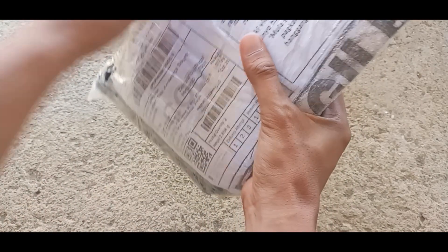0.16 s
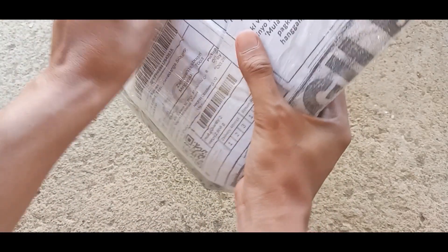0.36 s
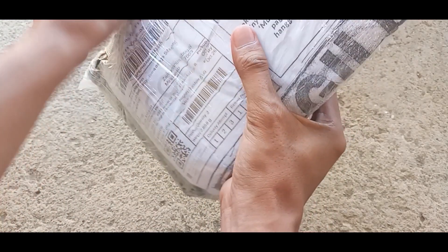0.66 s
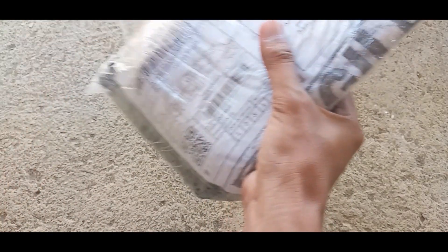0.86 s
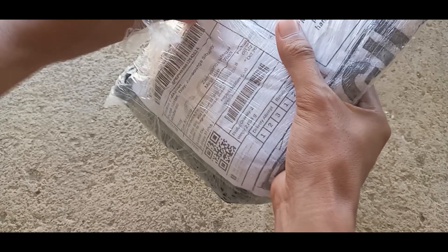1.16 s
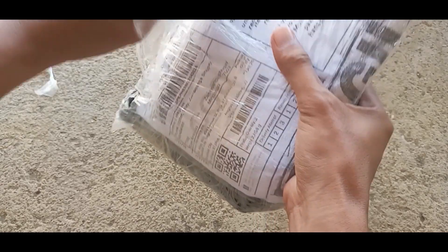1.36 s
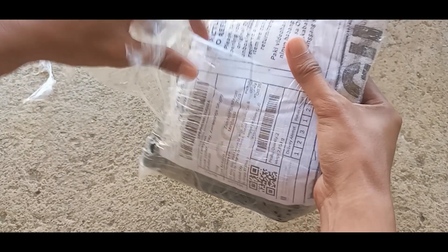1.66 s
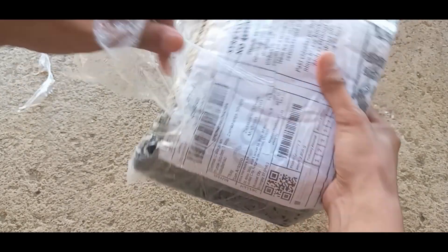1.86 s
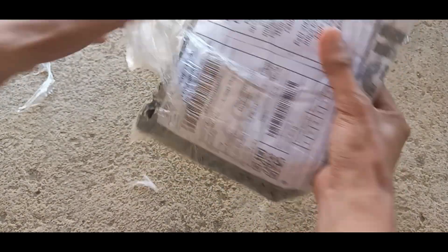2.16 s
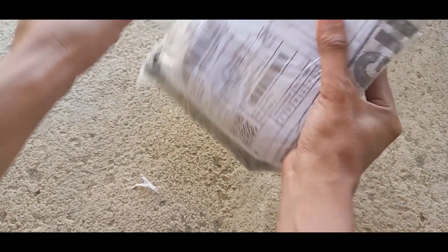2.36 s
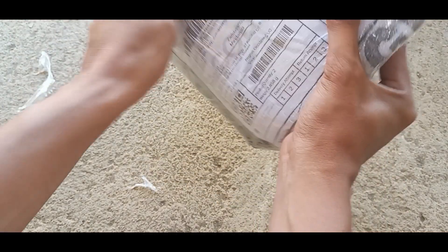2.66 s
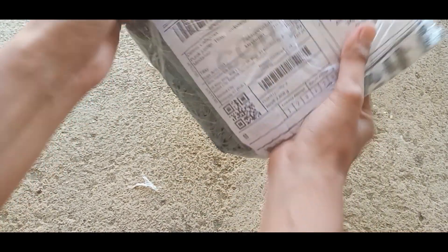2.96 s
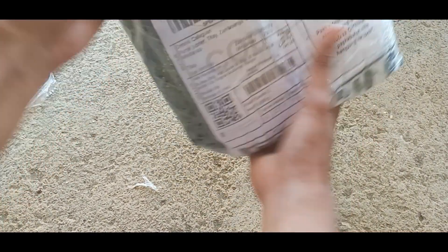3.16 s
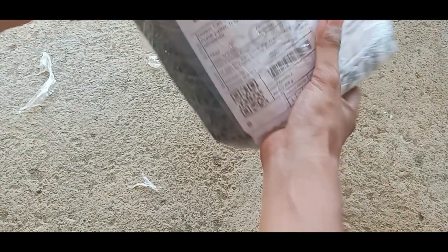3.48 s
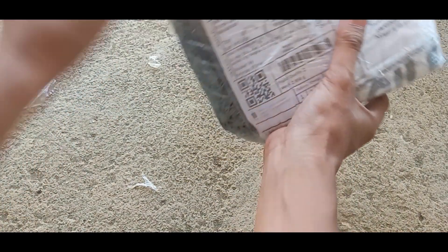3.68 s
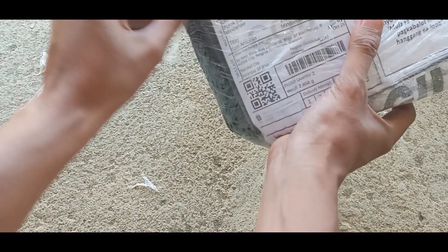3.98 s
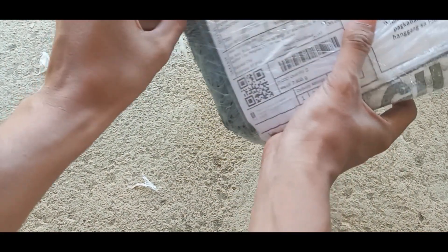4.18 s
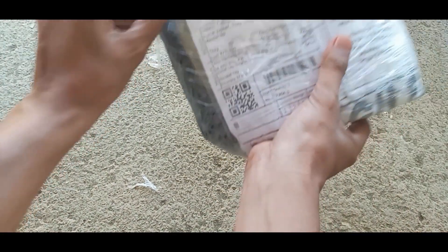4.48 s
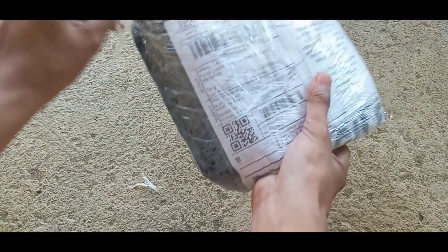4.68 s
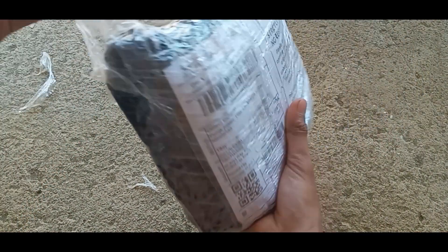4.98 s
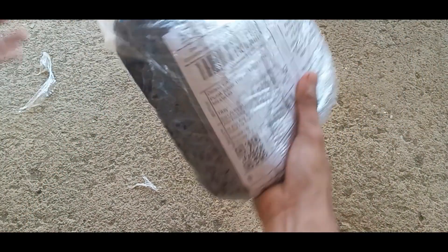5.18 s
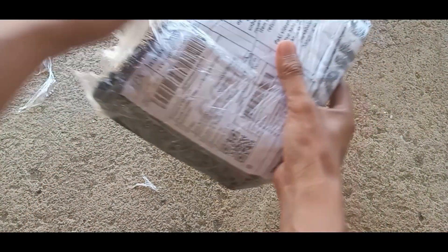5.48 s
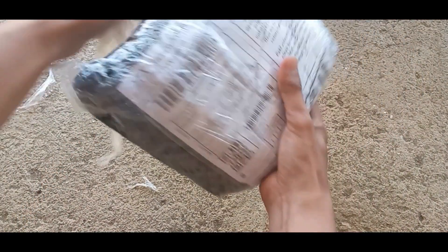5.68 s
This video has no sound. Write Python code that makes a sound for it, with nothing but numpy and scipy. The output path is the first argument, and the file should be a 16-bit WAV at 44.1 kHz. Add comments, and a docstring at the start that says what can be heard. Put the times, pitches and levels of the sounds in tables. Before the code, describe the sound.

Close-up clear plastic wrap crinkles in bursts of sharp crackling as hands tug it off a parcel, with snaps, pops and one ripping release.

```python
"""In a quiet room, close up, hands pull clear stretch wrap off a parcel in a plastic bag.
The film crinkles in swarms of buckling clicks, shaped in bands from hollow body to thin film.
Strands snap as noise bursts with decaying rings; panels pop and flip, and the parcel thuds softly.
Once the sheet rips free with two puffs of air, made as falling tones.
Resonances driven by noise form a low rumble that swells and fades underneath."""
import sys
import numpy as np
from scipy import signal
from scipy.fft import rfft, irfft, next_fast_len
from scipy.io import wavfile
from scipy.ndimage import uniform_filter1d

SR = 44100
rng = np.random.default_rng(int(sys.argv[2]) if len(sys.argv) > 2 else 0)


def int16_out(signal):
    """Quantize to a 16-bit WAV file."""
    q = np.round(np.clip(np.atleast_2d(signal).T, -1, 1) * 32767)
    wavfile.write(sys.argv[1], SR, q.astype(np.int16))


N = 257103
TIME = np.arange(N) / SR

# Loud snaps of folds and strands.
# Each row: start in seconds, level in dB before a common trim, ring frequency in Hz.
SNAPS = [(0.7406, -22.5, 2060), (1.0707, -26.5, 10300), (1.2961, -22, 1080), (1.3935, -22.5, 4600),
         (1.4231, -19.5, 2071), (1.5240, -23, 5900), (1.6608, -19.5, 6805), (1.6904, -11.5, 2200),
         (1.8872, -16.5, 5800), (1.9262, -20, 1970), (2.0224, -19.5, 1090), (2.556, -27, 4825),
         (2.694, -19.5, 1080), (2.798, -25.5, 4600), (2.8372, -21, 11170), (2.8595, -18, 6160),
         (2.9196, -27, 5240), (2.9569, -26, 7935), (3.1424, -22, 10630), (3.172, -19, 6850),
         (3.2026, -9.5, 2696), (3.3524, -27, 4767), (3.3948, -22, 1350), (3.506, -25.5, 2873),
         (3.97, -32, 10300), (4.0962, -23, 4300), (4.1065, -22.5, 3592), (4.1649, -23, 6340),
         (4.3460, -24.5, 7830), (4.4094, -18.5, 2018), (4.443, -18.5, 8610), (4.458, -18, 5840),
         (4.4915, -21.5, 1171), (4.6392, -16.5, 4368), (4.6489, -17.5, 3380), (4.662, -27, 7600),
         (4.6706, -22.5, 1048), (4.6787, -22, 5500), (4.7291, -20, 2300), (4.901, -27.5, 6400),
         (5.1858, -35.5, 7032), (5.3366, -25.5, 2622)]


def from_db(db):
    """Amplitude gain is a power of ten of the level: 20 dB is a factor of ten."""
    return 10 ** (np.asarray(db) / 20)


def rms_one(x):
    """Normalization: division by the root mean square gives unit power."""
    return x / np.sqrt(np.mean(x ** 2) + 1e-20)


def butter(x, hz, kind, order=2):
    """Causal Butterworth filtering has a maximally flat passband."""
    sos = signal.butter(order, np.clip(hz, 10, .45 * SR), kind, fs=SR, output="sos")
    return signal.sosfilt(sos, x + 1e-18)


def resonate(x, hz, width_hz):
    """A damped resonator is a conjugate pole pair; its peak gain is about 1."""
    radius = np.exp(-np.pi * width_hz / SR)
    zeros = np.array([1, 0, -1]) * (1 - radius * radius) / 2
    poles = [1, -2 * radius * np.cos(2 * np.pi * hz / SR), radius * radius]
    return signal.lfilter(zeros, poles, x + 1e-18)


def drift(rate):
    """Slow random modulation: `rate` random values a second, joined by lines, with unit RMS."""
    knots = rng.standard_normal(4096)
    return rms_one(np.interp(TIME * rate, np.arange(len(knots)), knots))


def even(x, seconds):
    """Division by short-time RMS removes slow swings of power and keeps the fast grain."""
    power = uniform_filter1d(np.mean(x ** 2, axis=0), int(seconds * SR) + 1)
    return x / np.sqrt(np.maximum(power, 0) + 1e-4 * np.mean(power))


def add(track, s, sound):
    """Superposition: a sound starting at s seconds sums into the track."""
    i = int(s * SR)
    track[..., i:i + sound.shape[-1]] += sound[..., :N - i]


def handling():
    """Effort envelopes: each pull builds, arches and lets go above the restless rustle of held film."""
    # Pulls and grabs at the film. Each row: start in seconds, length in seconds, crinkle in relative dB,
    # then stiff folds, crumpling bag and hollow body, each in dB above the crinkle.
    pulls = [(0.01, 0.09, -37.0, -12.5, -30, -33), (0.13, 0.09, -33.5, -10, -18.5, -27.5),
             (0.25, 0.08, -29.5, -7.5, -13.5, -26), (0.361, 0.09, -32.0, -7, -11.5, -17),
             (0.495, 0.07, -33.0, -7, -12.5, -22), (0.655, 0.065, -28.0, -11, -14.5, -20.5),
             (0.792, 0.065, -28.5, -12, -17, -25), (0.901, 0.061, -39, -17.5, -37, -28),
             (1.03, 0.061, -38, -15, -21.5, -27), (1.11, 0.091, -32.5, -10.5, -20, -39),
             (1.233, 0.0491, -30.0, -10.0, -14.5, -25), (1.31, 0.12, -26.5, -8.5, -17.5, -27),
             (1.47, 0.1, -28.5, -9, -18.5, -20.5), (1.6, 0.2, -30.0, -8.0, -14, -19),
             (1.823, 0.07, -24.0, -7.5, -17, -17), (1.911, 0.12, -30.0, -9.5, -17.5, -21.5),
             (2.069, 0.15, -34.0, -10.5, -16, -23), (2.33, 0.018, -41, -10.5, -28, -26),
             (2.445, 0.0355, -37.0, -8, -11.0, -19.0), (2.52, 0.1, -28, -9, -12.5, -19),
             (2.65, 0.092, -29.5, -8.5, -10, -25), (2.759, 0.11, -31.0, -9, -15, -29.5),
             (2.89, 0.13, -30.0, -7.5, -15.5, -21.5), (3.04, 0.025, -33, -13, -18.5, -31),
             (3.09, 0.065, -27.5, -10.5, -15, -31), (3.226, 0.1222, -37.0, -1.5, -7.5, -10),
             (3.326, 0.095, -30.5, -10.5, -17, -24.5), (3.475, 0.0372, -32.0, -8.5, -20.5, -31.0),
             (3.55, 0.28, -39.0, -13, -23.5, -23.5), (3.864, 0.055, -35.5, -11.5, -26, -17.5),
             (4.025, 0.03, -41, -7, -14, -17), (4.09, 0.028, -35, -10, -34, -25),
             (4.172, 0.11, -27.5, -11.5, -18.5, -30), (4.35, 0.07, -34.5, -9.5, -17.5, -32),
             (4.45, 0.055, -26.0, -9, -16.5, -46), (4.569, 0.02, -33.5, -4, -11.5, -36),
             (4.642, 0.045, -21.5, -13, -17.5, -21.5), (4.71, 0.12, -30.5, -10.5, -19.5, -19.5),
             (4.906, 0.085, -30.0, -12, -19.5, -28), (5.315, 0.03, -41, -11, -19, -22),
             (5.478, 0.11, -33.0, -4.5, -12.5, -15.5), (5.595, 0.2, -29.5, -8.5, -16.0, -20)]
    # Settling film between pulls: relative crinkle, stiff folds, crumpling bag and hollow body in dB.
    rest_db = (-43.5, -58, -75, -67)
    build_db_per_s, release_db_per_s, arch_db = 308, 210, 2
    restless_db, restless_per_s = 2.04, 22
    slip_db, slips_per_s = 0.81, 20
    # dB that thin film, folds, bag and body move for each dB of the thin film
    swing = np.array([[1], [0.96], [1.31], [1.31]])
    level = np.array(rest_db)[:, None] + swing * restless_db * drift(restless_per_s)
    for s, length, db, *parts_db in pulls:
        near = slice(max(0, int((s - .5) * SR)), int((s + length + .5) * SR))
        t = TIME[near] - s
        arch = arch_db * (np.sin(np.pi * np.clip(t / length, 0, 1)) - 2 / np.pi)
        build = build_db_per_s * np.maximum(-t, 0)
        release = release_db_per_s * np.maximum(t - length, 0)
        pull = db + np.array([0, *parts_db])[:, None] + swing * (arch - build - release)
        level[:, near] = np.maximum(level[:, near], pull)
    # the grip slips and catches, so the sound wavers
    return level + swing * slip_db * drift(slips_per_s)


def crinkle(fine, folds, crumple, body, per_s=1400, clump_db=4.0, size_db=5.5, colour_db=3.5,
            aim=0.86, scatter_db=3.0, scatter_s=0.012, bright=0.044, shift_db=3.0,
            crinkle_db=-39.5, fold_db=-31.0, crumple_db=-24.0, body_db=-21.5):
    """Avalanche buckling: clustered random clicks, each with its own size, colour and direction."""
    effort = fine - np.mean(fine)
    # harder handling buckles more creases a second
    rate = per_s * from_db(.25 * effort + clump_db * drift(200))
    at = np.flatnonzero(rng.random(N) < rate / SR)
    sizes = from_db(size_db * np.minimum(rng.exponential(1, N), 3.6))[at]
    levels = np.array([body + body_db, crumple + crumple_db, folds + fold_db, fine + crinkle_db])
    edges = np.geomspace(200, 17500, 23)   # Hz
    out = np.zeros((2, N))
    white = rng.standard_normal((2, 2, N))
    keep = np.exp(-1 / (scatter_s * SR))
    for k, (low, high) in enumerate(zip(edges, edges[1:])):
        hz = np.sqrt(low * high)
        chance = rng.standard_normal((N // 8, 4))[:len(at)].T
        spread = min(1, low / 2000)   # long waves reach both ports alike
        direction = np.sign(chance[1]) + aim * spread * chance[2:]
        clicks = np.zeros((2, N))
        clicks[:, at] = sizes * from_db(colour_db * chance[0]) * direction
        # the moving sheet scatters each click into a short hiss
        energy = signal.lfilter([1 - keep], [1, -keep], clicks ** 2 + 1e-18)
        scatter = np.sqrt(energy) * white[k % 2]
        band = butter(clicks + from_db(scatter_db) * spread * scatter, [low, high], "band")
        band = even(band, .035)
        # rising in pitch: hollow body, crumpling bag, stiff folds, thin film
        zone = np.interp(np.log(hz), np.log([550, 900, 1400, 1900, 3200, 6000]), [0, 1, 1, 2, 2, 3])
        level = np.maximum(1 - abs(zone - np.arange(4)), 0) @ levels
        # tauter film is brighter; pockets between folds keep changing their colour
        level = level + bright * effort * max(0, np.log2(hz / 7000))
        level = level + shift_db * min(1, 3000 / hz) * drift(22)
        out += band * from_db(level) * np.sqrt(high - low)
    return out


def pops(folds, per_s=70, level_db=6.0, size_db=4.0, width_hz=130, low_hz=950, high_hz=4800, glide=0.025):
    """Snap-through of small panels between stiff folds excites damped modes with gliding pitches."""
    t, out = np.arange(SR // 40) / SR, np.zeros((2, N))
    at = np.flatnonzero(rng.random(N) < per_s / SR)
    for i, (pitch, *chance) in zip(at, rng.random((N // 100, 5))):
        size, bend, left, right = 2 * np.array(chance) - 1
        hz = low_hz * (high_hz / low_hz) ** pitch
        turns = hz * t * (1 + glide * bend * t / t[-1])
        damping = np.exp(-np.pi * width_hz * np.sqrt(hz / 2000) * t)
        db = folds[i] + level_db + size_db * (size + np.array([[left], [right]]))
        add(out, i / SR, np.sin(2 * np.pi * turns) * damping * from_db(db))
    return out


def pre_snap_dip(dip_share=0.63, dip_from_db=-24.0, half_s=0.022, lead_s=0.00093):
    """Amplitude modulation: crinkle and pops dip briefly before each strong snap, deeper for stronger ones."""
    dip_db = np.zeros(N)
    for s, db, hz in SNAPS:
        dip = np.hanning(int(2 * half_s * SR))
        add(dip_db, s - lead_s - 2 * half_s, dip_share * max(0, db - dip_from_db) * dip)
    return from_db(-dip_db)


def small_snaps(fine, per_s=22, follow=.45, above_db=4.5, low_hz=1870, high_hz=10100):
    """Random point process: rows like SNAPS come more often and louder the harder the pull."""
    rate = per_s * from_db(follow * (fine - np.mean(fine)))
    at = np.flatnonzero(rng.random(N) < rate / SR)
    pitch = rng.random(N // 100)[:len(at)]
    return list(zip(at / SR, fine[at] + above_db, low_hz * (high_hz / low_hz) ** pitch))


def snaps(rows, crack_s=0.00067, ring_width_hz=380, ring_db=-4.0, aim=1.0, level_db=3.0,
          flutter_db=-26.0, flutter_s=0.0027):
    """Sudden release: a strand lets go and cracks, and its film patch rings and flutters out."""
    t, out = np.arange(SR // 50) / SR, np.zeros((2, N))
    noises = rng.standard_normal((400, 3, len(t)))
    for (s, db, hz), noise in zip(rows, noises):
        fade = np.exp(-t / crack_s) + from_db(flutter_db) * np.exp(-t / flutter_s)
        # a small patch radiates little below its own pitch
        crack = butter((noise[0] + aim * noise[1:]) * fade, [0.43 * hz, 14000], "band", order=1)
        ring = np.sin(2 * np.pi * hz * t) * np.exp(-np.pi * ring_width_hz * t)
        snap = rms_one(crack) + from_db(ring_db) * rms_one(ring)
        onset_rms = np.sqrt(np.mean(snap[:, :SR // 700] ** 2))
        add(out, s, from_db(db + level_db) * snap / onset_rms)
    return out


def flips(width_hz=420, fade_s=0.0025, aim=1.0):
    """Forced resonance: a slack panel's brief noisy stutter rings hollow at the panel's own pitch."""
    # Flips of slack panels. Each row: start in seconds, peak in dB, ring frequency in Hz.
    panel_flips = [(1.7080, -18, 2300), (1.7180, -19, 2300), (3.6257, -28.5, 2500), (3.759, -17.5, 2050),
                   (3.8609, -11.5, 2120), (3.8962, -21, 1179), (4.017, -25, 2820), (5.2771, -30, 2197),
                   (5.2958, -29, 2165), (5.4734, -20, 3460)]
    t, out = np.arange(SR // 40) / SR, np.zeros((2, N))
    for s, db, hz in panel_flips:
        noise = rng.standard_normal((3, len(t))) * np.exp(-t / fade_s)
        tick = resonate(noise[0] + aim * noise[1:], hz, width_hz)
        tick = resonate(tick, hz, 4 * width_hz)
        add(out, s, from_db(db) * tick / np.max(abs(tick)))
    return out


def puffs(fade_s=0.0048, skew_s=0.0021):
    """Air displacement by the freed sheet: a quick push and a slower pull back, damped exponentially."""
    # Jerks of the sheet. Each row: start in seconds, level in dB before the decay,
    # reference frequency in Hz from which the falling frequency is scaled.
    jerks = [(4.6509, -9, 123.2), (4.6701, -14, 150)]
    t, out = np.arange(SR // 20) / SR, np.zeros(N)
    for s, db, hz in jerks:
        turns = np.cumsum(hz * (0.46 + 2.75 * np.exp(-t / skew_s))) / SR
        add(out, s, from_db(db) * np.sin(2 * np.pi * turns) * np.exp(-t / fade_s))
    return out


def bumps(width_hz=110, fade_s=0.019):
    """Damped resonance: fading noise excites the soft, scuffing thuds of the padded parcel."""
    # Bumps of the hand on the parcel. Each row: start in seconds, peak in dB, thud frequency in Hz.
    thuds = [(0.188, -30, 317), (1.605, -26, 149.6), (1.624, -34, 287.2), (2.905, -34, 189),
             (3.095, -41.5, 139.3), (3.203, -35, 258.2), (3.384, -31, 245.1), (4.966, -33, 287.8),
             (5.569, -29.5, 349.6), (5.719, -32.5, 246.7)]
    t, out = np.arange(SR // 10) / SR, np.zeros(N)
    for s, db, hz in thuds:
        noise = rng.standard_normal(len(t)) * np.exp(-t / fade_s)
        thud = resonate(resonate(noise, hz, width_hz), hz, 2 * width_hz)
        add(out, s, from_db(db) * thud / np.max(abs(thud)))
    return out


def reflections(x, parcel_s=0.001121, parcel_db=-15.5, arm_s=.0034, arm_db=-15.5, sway=0.159, sway_per_s=5.0):
    """Comb filtering: echoes off parcel and arm shift the colour as moving hands change their paths."""
    out = x.copy()
    for delay_s, db in [(parcel_s, parcel_db), (arm_s, arm_db)]:
        then = TIME - delay_s * np.exp(sway * drift(sway_per_s))
        out += from_db(db) * np.array([np.interp(then, TIME, side) for side in x])
    return out


def tail(x, t60, dull_hz):
    """Diffuse reverberation: convolution with decaying noise of unit energy, different at each port."""
    t = np.arange(SR // 2) / SR
    noise = butter(rng.standard_normal((2, len(t))), dull_hz, "low", order=1)
    echo = noise * from_db(-60 * t / t60)
    echo /= np.sqrt(np.sum(echo ** 2, axis=1, keepdims=True))
    return signal.fftconvolve(np.atleast_2d(x), echo, axes=1)[:, :N]


def ports(x, lag_s=42 / SR, shared_top_hz=8400):
    """Minimum-phase colouring at two microphone ports; below the top octave the left one lags."""
    # Colour of the ports. Each row: frequency in Hz, left gain in dB, right gain in dB.
    port_colour = [(382, 0, -2.5), (512, 0, -4), (651, -1.5, -4.5), (814, -10, -12.5), (1204, -0.5, -4.5),
                   (1570, -4.5, -5.5), (1710, 0.5, -8), (5240, 1.5, -2), (6650, 10, -1.5), (7660, 7, -8.5),
                   (8350, 0, -7.5), (10100, -7.5, 1), (13360, -12.5, -11), (14850, 2, 0)]
    size = next_fast_len(N + SR // 10) // 2 * 2
    hz = np.arange(size // 2 + 1) * SR / size
    knots, *sides = np.transpose(port_colour)
    gain_db = [np.interp(np.log(hz + 1), np.log(knots), side) for side in sides]
    # folding the cepstrum onto positive times makes the response causal
    cepstrum = irfft(np.log(from_db(gain_db)), size)
    cepstrum[:, 1:size // 2] *= 2
    cepstrum[:, size // 2 + 1:] = 0
    response = np.exp(rfft(cepstrum))
    response[0] *= np.exp(-2j * np.pi * np.minimum(hz, shared_top_hz) * lag_s)
    return irfft(rfft(x, size) * response, size)[:, :N]


def rumble(left_db=1.0, right_db=-7.5, apart=1.3, swell_from_db=-36.5, swell_span_db=9.0, lean_db=-22.0,
           lumps_hz=85, lumps_width_hz=90, lumps_db=-4.0, lumpy_db=10.0):
    """Noise-driven resonances make a low drone; as it swells it turns lumpy and leans to the left."""
    # Drone level before the side gains. Each row: time in seconds, level in dB.
    rumble_level = [(0.0, -49.0), (0.06, -42.5), (0.34, -56.0), (0.44, -47.5), (0.56, -55), (0.84, -48),
                    (1.2, -40.5), (1.28, -54.5), (1.42, -43.5), (1.56, -63), (1.82, -48), (2.02, -56),
                    (2.16, -46.5), (2.7, -49), (2.72, -61.0), (2.84, -72), (3.14, -66.0), (3.44, -51.5),
                    (4.0, -41.5), (4.18, -44.5), (4.28, -60.5), (4.9, -61), (5.04, -45), (5.22, -38.5),
                    (5.38, -23.5), (5.82, -62.5)]
    # Resonances of the drone. Each row: frequency in Hz, width in Hz, relative level in dB.
    rumble_modes = [(71.6, 54, -17), (115.8, 29, 1), (147.4, 16.5, 5.5), (166, 47, -2)]
    times, levels = np.transpose(rumble_level)
    level = np.interp(TIME, times, levels)
    swell = np.clip((level - swell_from_db) / swell_span_db, 0, 1)
    noise = rng.standard_normal((2, N))
    drone = np.zeros((2, N))
    for k, (hz, width, db) in enumerate(rumble_modes):
        drone += from_db(db) * (-1) ** k * resonate(noise, hz, width)   # neighbours in opposite phase
    drone = butter(butter(drone, 171, "low", order=4), 33, "high")
    lumpy_noise = rng.standard_normal((1, N)) * from_db(lumpy_db * drift(80))
    lumps = butter(resonate(lumpy_noise, lumps_hz, lumps_width_hz), [45, 360], "band", order=4)
    near = (even(drone[:1], .06) + from_db(lumps_db) * swell * even(lumps, .06))[0]
    far = from_db(right_db + lean_db * swell) * (near + apart * rms_one(drone[1]))
    return from_db(level) * np.array([from_db(left_db) * near, far])


def room_air(floor_db=-62.5):
    """Low-passed random noise, independent on the two sides, forms the steady noise floor."""
    return from_db(floor_db) * rms_one(butter(rng.standard_normal((2, N)), 400, "low", order=1))


def scene(puff_left_db=0.0, puff_right_db=-18.0, room_t60_s=0.11, room_db=-18.5):
    """Superposition of direct sound, echoes and reverberation; the puffs reach mostly the left port."""
    fine, folds, crumple, body = handling()
    film = (crinkle(fine, folds, crumple, body) + pops(folds)) * pre_snap_dip()
    film = film + snaps(list(SNAPS) + small_snaps(fine)) + flips()
    film = reflections(butter(film, 270, "high")) + bumps()
    film = film + from_db(room_db) * tail(film, room_t60_s, 5700)
    push = puffs() * from_db([[puff_left_db], [puff_right_db]])
    return ports(film + push) + rumble() + room_air()


def record(dry):
    """Soft saturation rounds the tallest peaks, and an elliptic low-pass cuts the top."""
    rounded = 1.05 * np.tanh(dry / 1.05)
    low_pass = signal.ellip(12, .2, 70, 15850, fs=SR, output="sos")   # cutoff 15850 Hz
    return signal.sosfilt(low_pass, rounded)


dry = scene()
out = record(dry)
int16_out(out)
```